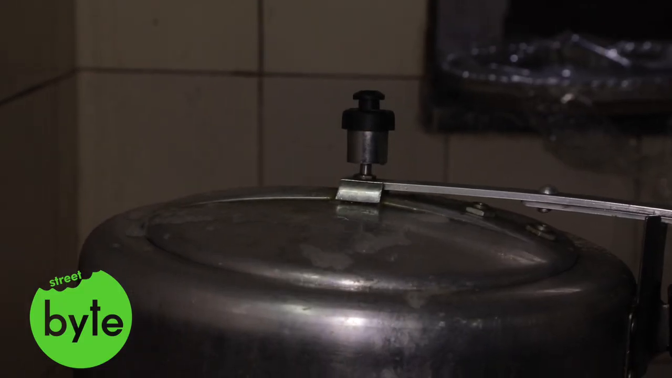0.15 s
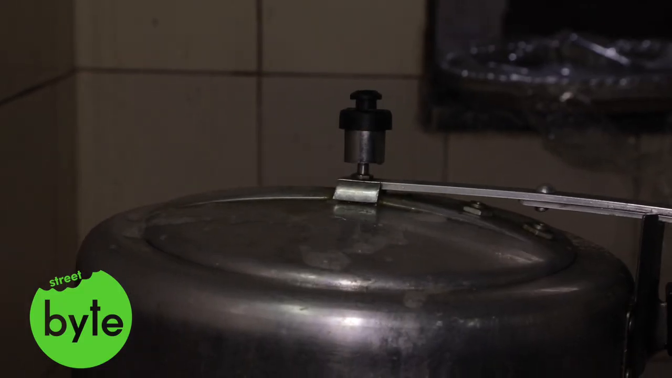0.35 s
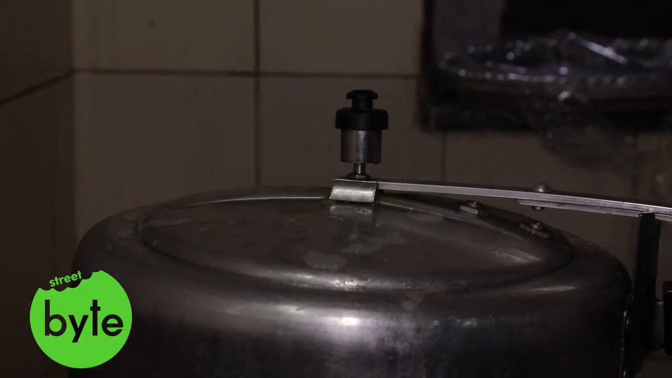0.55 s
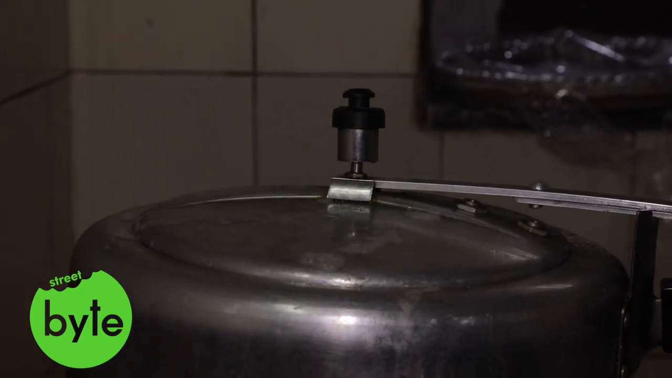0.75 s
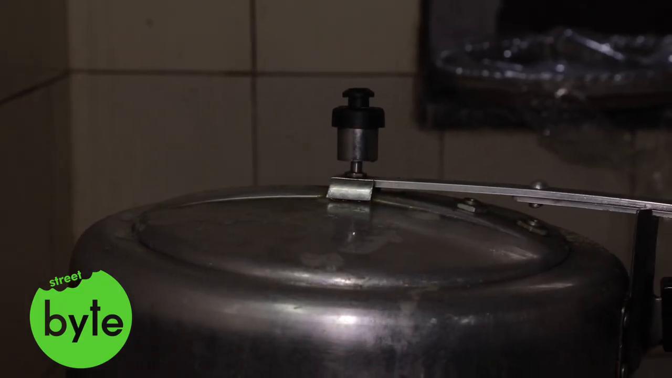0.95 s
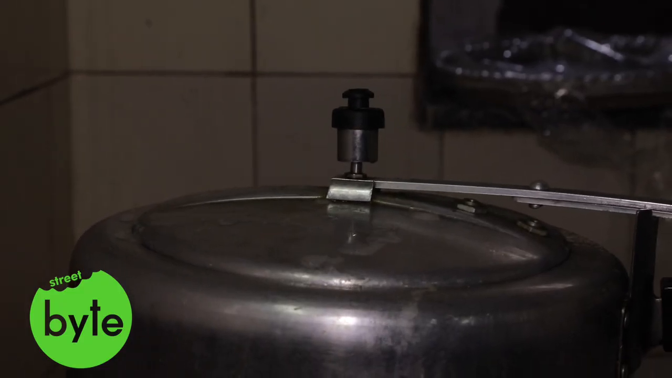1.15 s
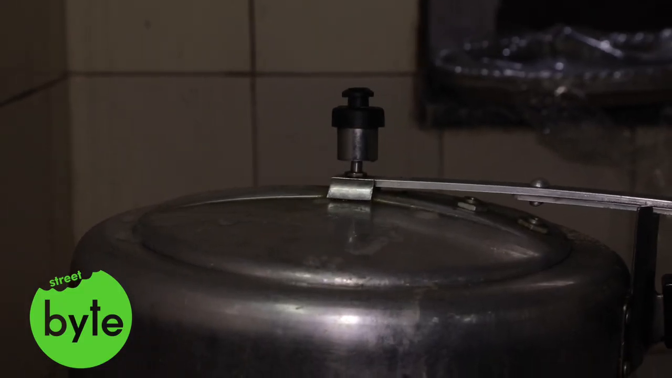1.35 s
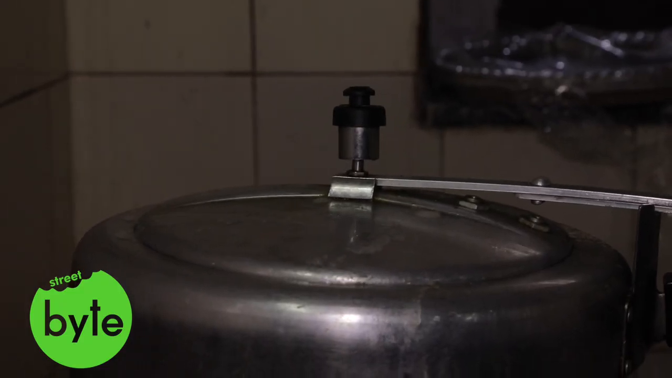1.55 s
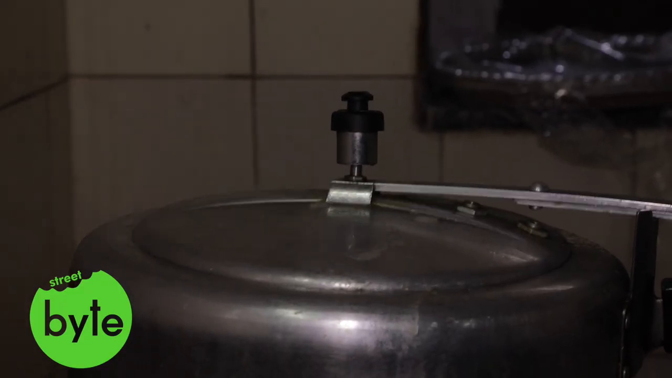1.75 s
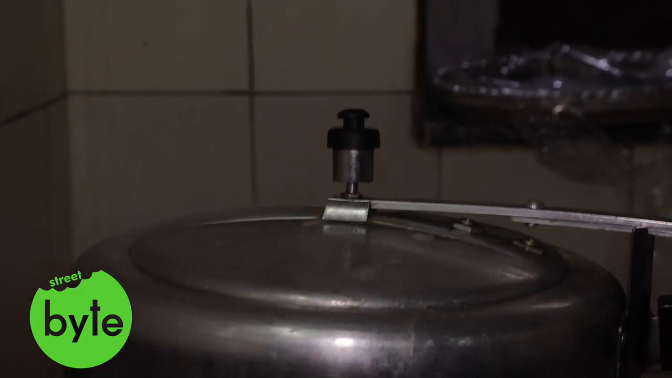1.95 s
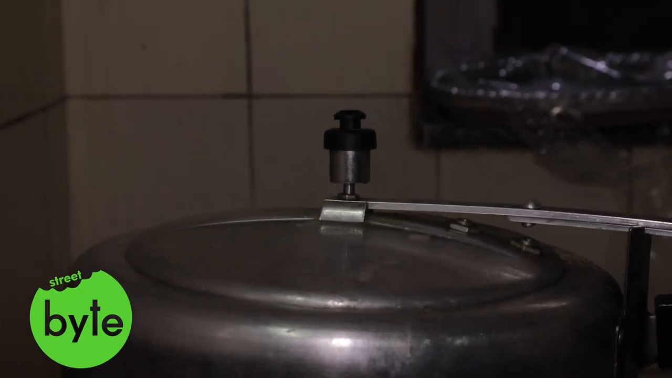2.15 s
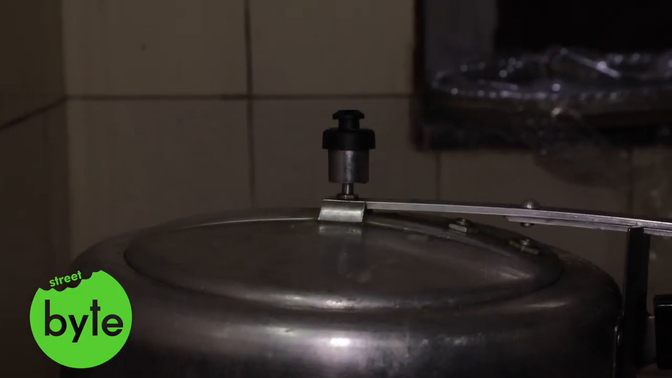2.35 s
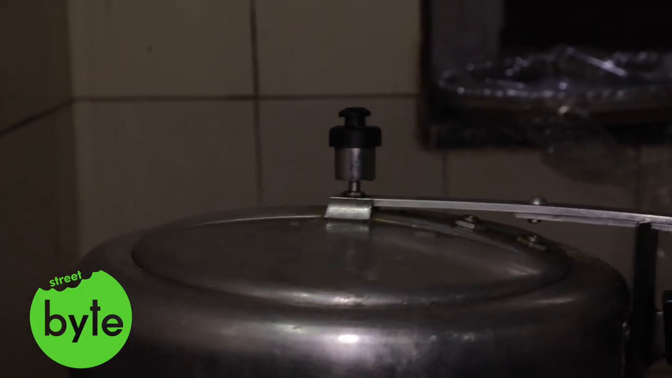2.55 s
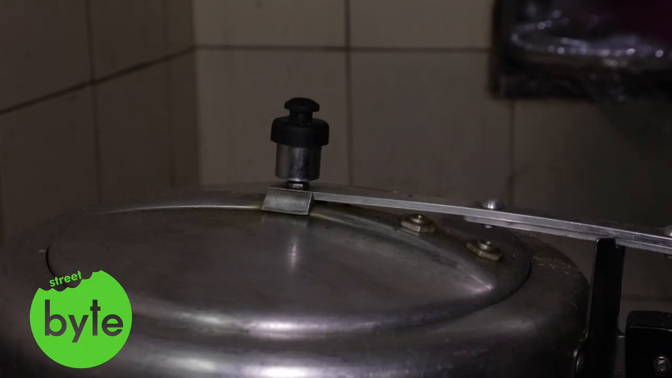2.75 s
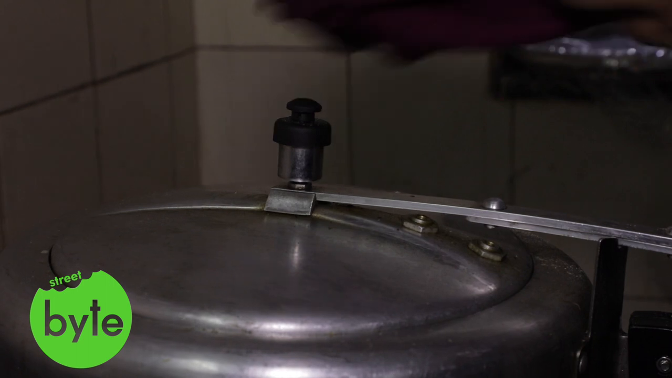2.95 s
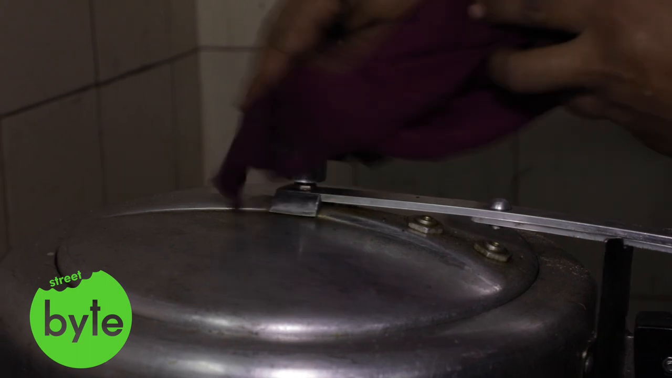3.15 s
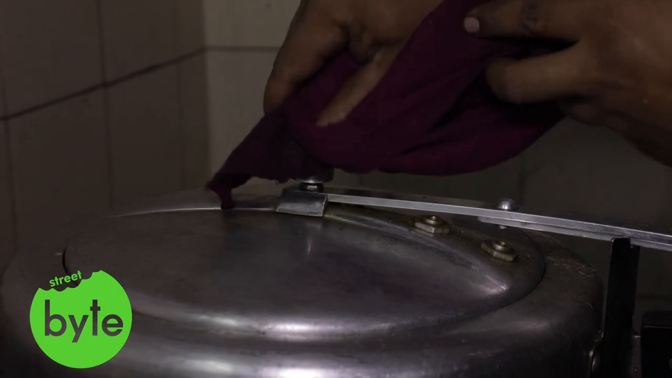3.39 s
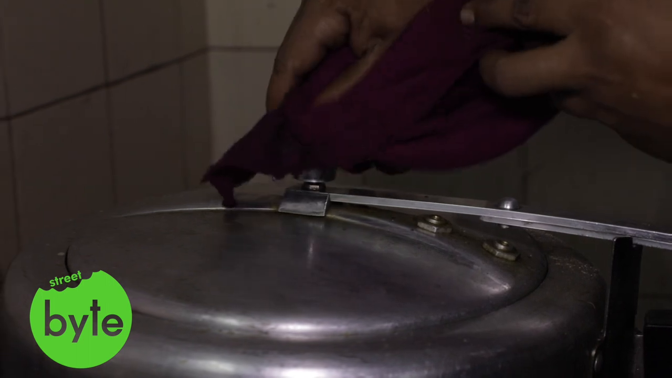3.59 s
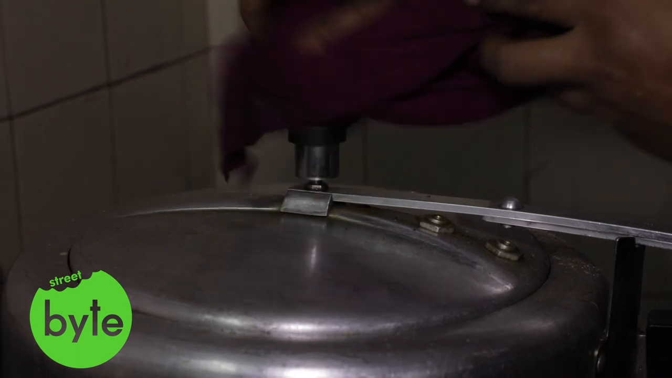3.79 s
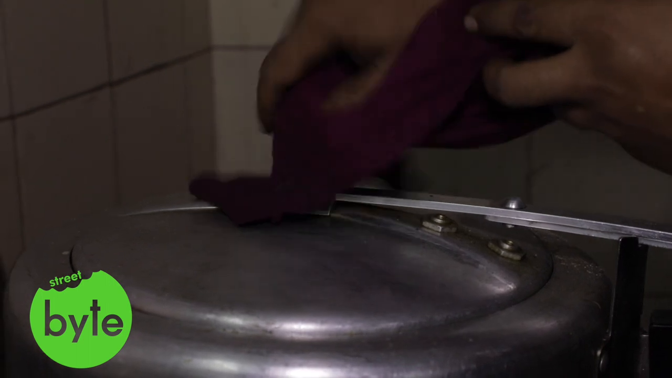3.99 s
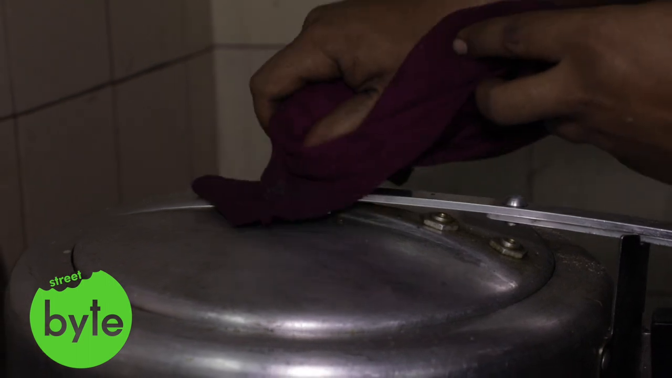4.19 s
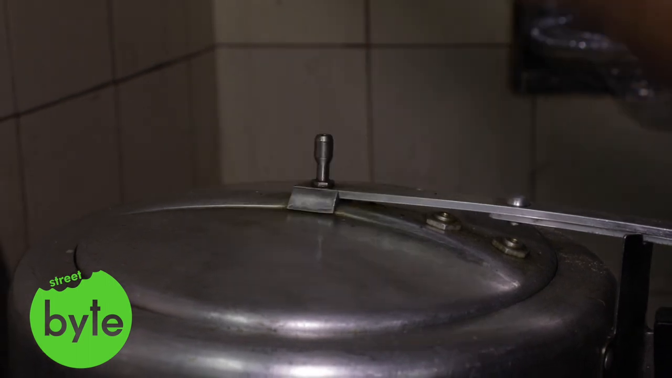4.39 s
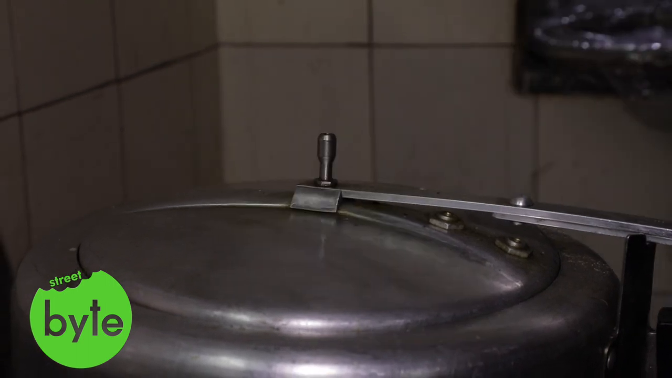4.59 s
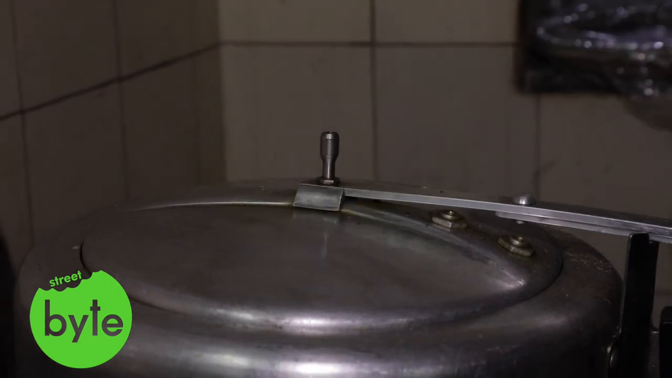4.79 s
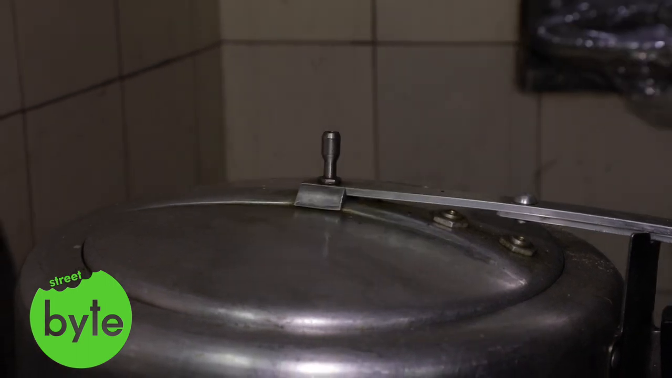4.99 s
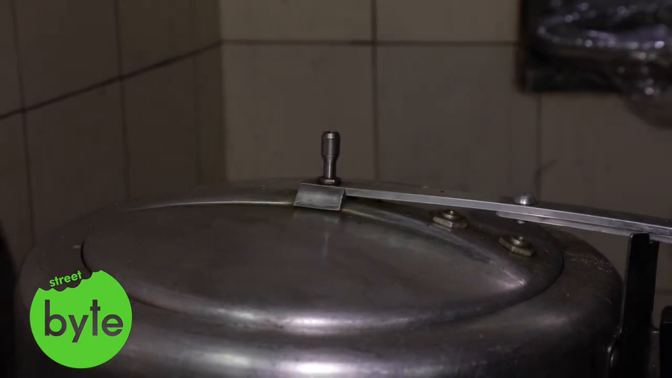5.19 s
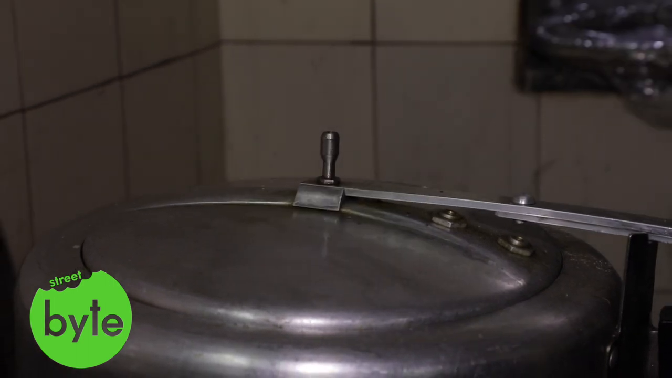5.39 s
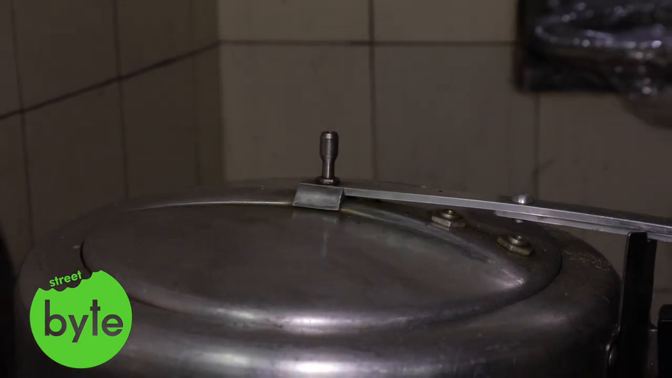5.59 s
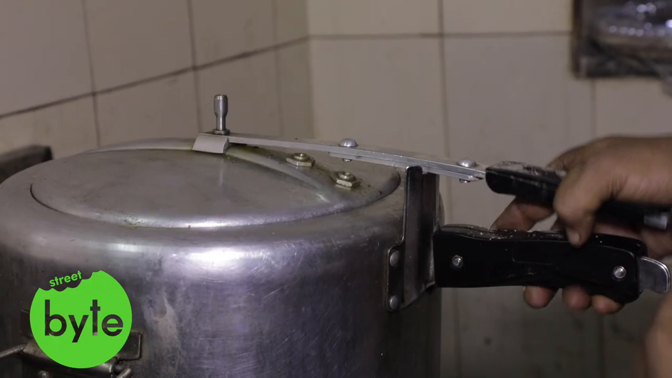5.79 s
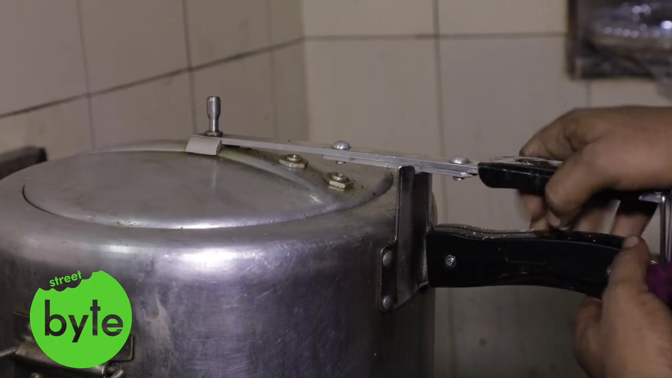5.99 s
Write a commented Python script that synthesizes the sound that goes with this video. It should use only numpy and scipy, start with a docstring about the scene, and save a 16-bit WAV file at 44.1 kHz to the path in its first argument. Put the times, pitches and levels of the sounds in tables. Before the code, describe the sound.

Close, centred microphone, slightly overloaded. A dense, bright steam jet fills the first part without pause, stopping suddenly. Quiet fan hum and soft air follow, with small knocks and brief spurts as the weight is rocked. A cluster of clanks and a scrape leads into a thin, fluttering, half-whistling hiss. That too snaps off, and a low kitchen hum with a fading trace of steam ends it.

```python
"""Steam roars from under the weight of a pressure cooker in a tiled kitchen, as shaped noise in three bands.
After a cut a hand in a cloth rocks the weight: short puffs of steam, and knocks that ring stem and lid.
The weight comes off with a scrape and the bare nozzle hisses on, with flickering narrow-band tones.
A last shot keeps a fading leak. Fan harmonics, wavering drones and air noise lie behind all three shots,
parted by short gaps: a faint tail of a few milliseconds dies away after each shot, then silence."""
import sys
import numpy as np
from scipy import signal
from scipy.fft import rfft, irfft, next_fast_len
from scipy.io import wavfile
from scipy.ndimage import uniform_filter1d

SR = 44100
rng = np.random.default_rng(int(sys.argv[2]) if len(sys.argv) > 2 else 0)


def bounce(signal):
    """Save signal as a 16-bit WAV file at the path given by the first command-line argument."""
    frames = np.transpose(np.atleast_2d(signal))
    limited = np.clip(frames, -1, 1)
    pcm = np.round(limited * 32767).astype(np.int16)
    wavfile.write(sys.argv[1], SR, pcm)


N = 266364
TIME = np.arange(N) / SR

# Every steam release table has these columns: opens_s, rise_s, shuts_s, hiss_db once risen,
# swell_db_per_s, shoulder_over_hiss_db, body_over_hiss_db. Colours are relative: hz, density_db (per Hz).

# colour of steam squeezed out under the weight: hz, density_db
UNDER_WEIGHT = [(42, -55), (60, -39), (160, -15.5), (227, -12.5), (346, -13), (380, -13.5), (621, -12.5),
                (1910, -12), (2850, -11.5), (3700, -15.5), (5210, -15), (7940, -8.5), (8710, -12),
                (10800, -4), (13000, -11), (16000, -21)]
# the one long roar, open before the start: release columns
ROAR = [(-1.1, .1, 7, -8, 0.18, -9, -10.5)]


def weight_roar():
    """Steam forced through the gap under the weight roars steadily, in the first shot only."""
    return jet(UNDER_WEIGHT, ROAR, flicker_db=0.26) * by_shot([1, 0, 0])


# colour of steam escaping under the cloth: hz, density_db
UNDER_CLOTH = [(500, -30), (1200, -20), (1700, -14), (2400, -12), (3300, -14), (5900, -17), (6600, -15),
               (7500, -10), (8500, -14.5), (9700, -1.5), (11400, -3), (12800, -10), (13600, -15),
               (16000, -23)]
# puffs as the weight is rocked: release columns
PUFFS = [(3.248, 0.03, 3.407, -32.5, 13, -5.5, -10.5), (3.686, 0.067, 3.92, -17, 4, -3, -10.5),
         (4.05, 0.0061, 4.165, -35, -2, -4.5, -7), (4.299, 0.022, 4.4, -26, 82, 0.5, 1)]


def rocking_puffs():
    """Each tilt of the weight opens a gap and lets out a short burst of turbulence."""
    return jet(UNDER_CLOTH, PUFFS, flicker_db=0.5)


# colour of steam from the bare nozzle: hz, density_db
BARE_NOZZLE = [(500, -36), (1200, -17.5), (1850, -12), (2150, -15.5), (2700, -9.5), (3600, -16.5),
               (4850, -11.5), (5900, -14), (6500, -7), (9000, -6.5), (11000, -3.5), (12200, -7),
               (13200, -7.5), (16000, -15)]
# the hiss once the weight is off: release columns
VENT = [(4.39, 0.061, 7, -21.5, 0.92, -6.5, -9.5)]


def bare_nozzle():
    """With the weight off, the open bore hisses until the second shot ends."""
    return jet(BARE_NOZZLE, VENT, flicker_db=0.6) * by_shot([0, 1, 0])


# narrow tones of the nozzle: hz, width_hz, level_db before flicker
NOZZLE_TONES = [(10900, 350, -39), (10500, 320, -32), (11550, 333, -33.5), (10400, 350, -49)]


def nozzle_tones():
    """The open bore half-whistles: narrow bands that come and go."""
    tones = 0
    for hz, width_hz, level_db in NOZZLE_TONES:
        tones = tones + undb(level_db + 4.8 * walk(5.7)) * narrow(hz, width_hz)
    fade_in = np.clip((TIME - VENT[0][0]) / 0.095, 0, 1)
    return tones * fade_in * by_shot([0, 1, 0])


# faint fading leak in the second and third shots: release columns
LEAK = [(2.74, .01, 5.72, -59.5, -5, 0.1, 0.1), (5.74, .01, 7, -48, -6, 0.55, .6)]


def faint_leak():
    """A weak, strongly flickering jet that dwindles through each of the last two shots."""
    return jet(UNDER_CLOTH, LEAK, flicker_db=1.2)


SHOULDER_HZ, HISS_HZ = 6300, 9000  # body lies below the shoulder, hiss above


def jet(colour, releases, flicker_db):
    """Turbulent steam: body, shoulder and hiss surge together, drift and flicker alone."""
    flows = np.array([release(*row[:5]) for row in releases])
    shoulder_db, body_db = np.transpose(releases)[5:]
    bands = ((0, SHOULDER_HZ, body_db),
             (SHOULDER_HZ, HISS_HZ, shoulder_db),
             (HISS_HZ, SR, 0 * body_db))
    surge_db = flicker_db * walk(4.34)
    steam = 0
    for lo_hz, hi_hz, over_hiss_db in bands:
        flow = undb(over_hiss_db) @ flows
        own_db = flicker_db * (walk(25) + walk(1.99))  # flicker plus slow drift
        steam = steam + flow * undb(surge_db + own_db) * noise(colour, lo_hz, hi_hz)
    return steam


RISE_POWER = 1.96  # the jet grows faster than the gap
# quick fall as the gap shuts, then a slower wisp
SHUT_DB_PER_S, LINGER_DB, LINGER_DB_PER_S = 386, -13, 152


def release(opens_s, rise_s, shuts_s, hiss_db, swell_db_per_s):
    """Flow rises as the gap opens, swells while held, falls fast and then lingers."""
    rise = np.clip((TIME - opens_s) / rise_s, 0, 1) ** RISE_POWER
    held_s = np.clip(TIME - opens_s - rise_s, 0, shuts_s - opens_s - rise_s)
    held = rise * undb(hiss_db + swell_db_per_s * held_s)
    after_s = np.maximum(TIME - shuts_s, 0)
    wisp = undb(LINGER_DB)
    fall = (1 - wisp) * undb(-SHUT_DB_PER_S * after_s) + wisp * undb(-LINGER_DB_PER_S * after_s)
    return held * fall


# ringing modes of the weight on its stem and lid: hz, level_db, t60_s
LID = [(640, -5, .05), (720, -2, .05), (810, 0, .07), (880, -2, .04), (945, 0, .05), (1090, -1, .05),
       (1280, -5, .03), (1480, -2, .04), (1680, 0, .04), (1900, 0, .05), (2100, -3, .03), (2380, 0, .04),
       (2780, -2, .035), (3150, -3, .03), (3900, -5, .03)]
# knocks and scrape of the weight: start_s, peak_db before the high-pass, contact_s (time constant),
# near_hz (modes favoured), reach_octaves
KNOCKS = [(3.187, -32, .004, 1900, .1), (3.19, -40, .003, 2780, .1), (3.434, -27, .002, 1500, .6),
          (4.054, -27, .002, 945, .15), (3.936, -23, .003, 830, .15), (3.937, -25, .003, 1900, .5),
          (3.96, -26, .006, 810, .1), (4.311, -15, .005, 1700, .5), (4.318, -12, .004, 980, .25),
          (4.357, -13, .004, 1900, .25), (4.367, -10, .004, 950, .3), (4.372, -15, .006, 2200, .6),
          (4.395, -14, .007, 2400, .45), (4.412, -15, .009, 2100, .6), (4.428, -18, .009, 1700, .9)]


def knocks():
    """Each rough contact of the weight rings the modes of stem and lid nearest to the spot it touches."""
    out, t = np.zeros(N), TIME[:SR // 8]
    hz, mode_db, t60_s = np.transpose(LID)[:, :, None]
    modes = undb(mode_db) * np.exp(-np.log(1000) * t / t60_s) * np.sin(2 * np.pi * hz * t)
    for start_s, peak_db, contact_s, near_hz, reach_octaves in KNOCKS:
        push = rng.standard_normal(len(t)) * t * np.exp(-t / contact_s)  # pressure builds, then eases
        favour = np.exp(-.5 * (np.log2(hz / near_hz) / reach_octaves) ** 2)
        ring = (favour * modes).sum(axis=0)
        sound = signal.fftconvolve(push, ring)
        i = int(start_s * SR)
        out[i:i + len(sound)] += undb(peak_db) * sound / np.abs(sound).max()
    # the small weight radiates no bass
    return signal.sosfilt(signal.butter(4, 550, "high", fs=SR, output="sos"), out)


TILES_DB, TILES_T60_S = -12, 0.05  # echo level against the direct sound, decay time
# how far the echo pattern wanders, one value per shot: wander_rad
STIR = [2.7, 1, 0.44]


def tiles(x):
    """Dense echoes from the tiled walls ripple the spectrum finely; hot rising steam stirs the pattern."""
    t = TIME[:SR // 4]
    decay = np.exp(-np.log(1000) * t / TILES_T60_S) * (t > .002)
    echoes = rng.standard_normal((2, len(t))) * decay
    echoes = echoes / np.sqrt(np.sum(echoes ** 2, axis=1, keepdims=True))
    shots = np.split(x, np.searchsorted(TIME, [start for start, _ in SHOTS[1:]]))  # no echo crosses a cut
    echoed = [signal.fftconvolve(shot[None], echoes, axes=1)[:, :len(shot)] for shot in shots]
    one, other = np.hstack(echoed)
    angle, wet = by_shot(STIR) * walk(3.01), undb(TILES_DB)
    stirred = np.cos(angle) * one + np.sin(angle) * other
    return (x + wet * stirred) / np.sqrt(1 + wet ** 2)


FAN_HZ = 101.53
# fan harmonics: multiple of FAN_HZ, first_shot_db, second_shot_db, third_shot_db (before wavering)
FAN = [(.25, -55, -58, -57), (4, -43, -40, -46), (6, -42, -41, -55), (1, -53, -53, -54), (3, -54, -54, -51),
       (5, -52, -52, -41), (7, -54, -54, -56), (8, -51, -50, -53), (9, -54, -53, -57), (10, -51, -50, -49)]


def fan():
    """A motor hums in harmonics of one slightly unsteady turning rate, each wavering in level."""
    turn = 2 * np.pi * np.cumsum(FAN_HZ * (1 + 0.001 * walk(1.446))) / SR
    hum = 0
    for multiple, *shot_db in FAN:
        level = undb(by_shot(shot_db) + 0.22 * min(multiple, 4) * walk(10.0))
        tone = np.sin(multiple * turn + rng.uniform(0, 2 * np.pi))
        hum = hum + np.sqrt(2) * level * tone  # root two: levels are rms
    return hum


# low drones: hz, width_hz, first_shot_db, second_shot_db, third_shot_db (before wavering)
DRONES = [(228, 7, -37.5, -67, -58), (191.3, 6.3, -62, -46, -46), (135, 30, -47.5, -59, -61)]


def drones():
    """Noise through narrow low resonances, wavering in level."""
    out = 0
    for hz, width_hz, *shot_db in DRONES:
        out = out + undb(by_shot(shot_db) + 1.4 * walk(7)) * narrow(hz, width_hz)
    return out


# relative colour of the kitchen air: hz, density_db (per Hz)
KITCHEN = [(35, -34), (60, -39), (80, -13), (200, -11.5), (340, -8.5), (420, -6.5), (620, -8),
           (1030, -11.5), (1270, -14.5), (1850, -15.5), (2200, -25.5), (2750, -23), (3400, -33),
           (6000, -47)]
KITCHEN_DB = -39  # rms level before wavering


def kitchen_air():
    """Low, soft air noise whose level wavers slightly."""
    return undb(KITCHEN_DB + 0.33 * walk(11)) * noise(KITCHEN)


# the three shots: start_s, end_s
SHOTS = [(-1, 2.7115), (2.7515, 5.7115), (5.7515, 7)]


def by_shot(values):
    """One value held through each shot."""
    return np.asarray(values)[np.searchsorted([start for start, _ in SHOTS[1:]], TIME)]


def undb(db):
    """Decibels to amplitude."""
    return 10 ** (np.asarray(db) / 20)


def unit(x):
    """Scale to rms 1."""
    return x / np.sqrt(np.mean(x ** 2))


def walk(rate):
    """Random levels held 1 / rate s and slewed twice; spread near 1."""
    k = int(SR / rate)
    steps = np.repeat(rng.standard_normal(N // k + 1), k)
    return 1.1 * uniform_filter1d(uniform_filter1d(steps, k), k)[:N]


def noise(colour, lo_hz=0, hi_hz=SR):
    """Noise of a given colour between two soft edges, rms 1."""
    size = next_fast_len(N)
    hz = np.arange(1, size // 2 + 2) * SR / size
    points_hz, points_db = np.transpose(colour)
    edges = 1 / np.sqrt((1 + (lo_hz / hz) ** 60) * (1 + (hz / hi_hz) ** 60))
    gain = undb(np.interp(np.log(hz), np.log(points_hz), points_db)) * edges
    return unit(irfft(rfft(rng.standard_normal(size)) * gain, size)[:N])


def narrow(hz, width_hz):
    """Noise through one resonance, rms 1."""
    return unit(signal.lfilter(*signal.iirpeak(hz, hz / width_hz, SR), rng.standard_normal(N)))


def scene():
    """Steam and knocks echo off the tiles; the kitchen background is added without echo."""
    steam = weight_roar() + rocking_puffs() + bare_nozzle() + nozzle_tones() + faint_leak()
    mono = tiles(steam + knocks()) + fan() + drones() + kitchen_air()
    return np.array([mono, mono])


OVERLOAD, TOP_HZ = .74, 15750  # soft ceiling in amplitude, low-pass edge


def record(dry):
    """One microphone on both channels, softly overloaded; each shot drops to a faint, quickly fading tail."""
    gate = 0
    for start, end in SHOTS:
        fade_in = np.clip((TIME - start) / 0.0018, 0, 1)
        tail = undb(-25.5) * np.exp(-np.abs(TIME - end) / 0.0048)
        gate = gate + fade_in * np.where(TIME < end, 1, tail) * (TIME < end + .03)
    overloaded = OVERLOAD * np.tanh(dry / OVERLOAD)
    low_pass = signal.ellip(14, .3, 80, TOP_HZ, fs=SR, output="sos")
    return signal.sosfilt(low_pass, overloaded * gate)


dry = scene()
out = record(dry)
bounce(out)
```